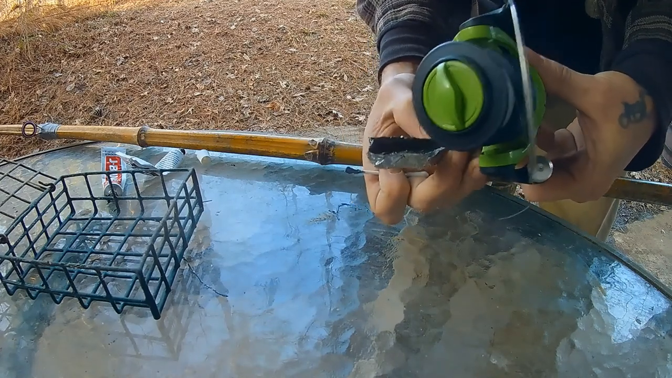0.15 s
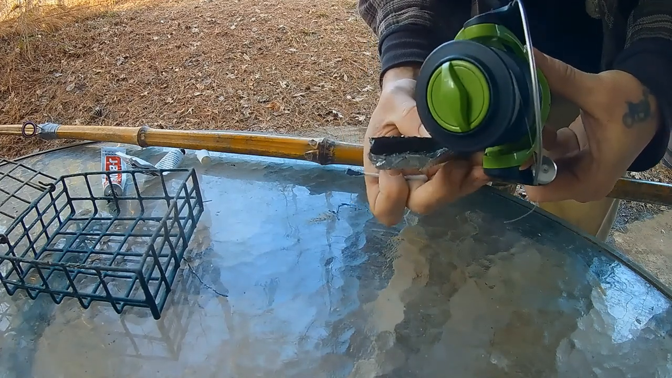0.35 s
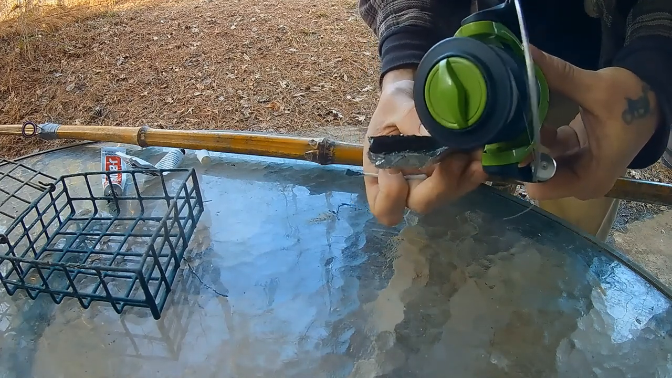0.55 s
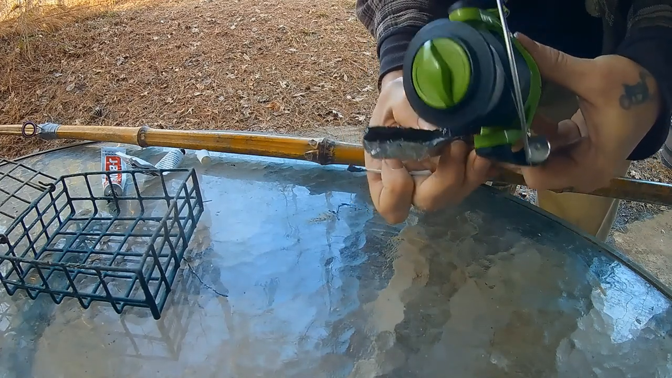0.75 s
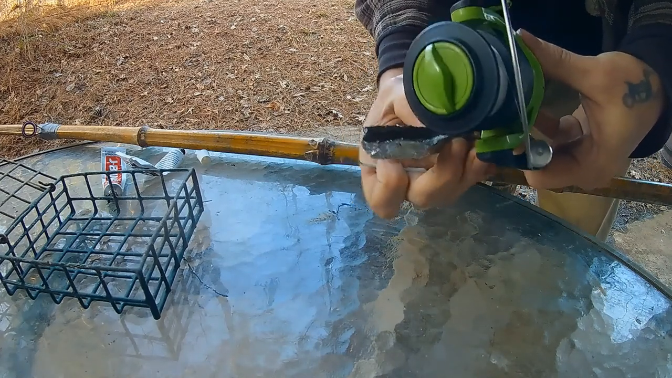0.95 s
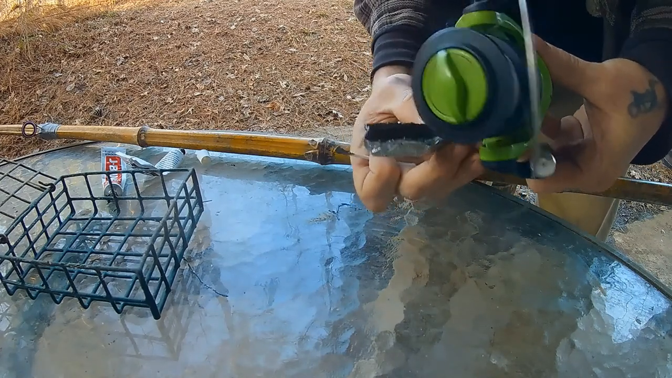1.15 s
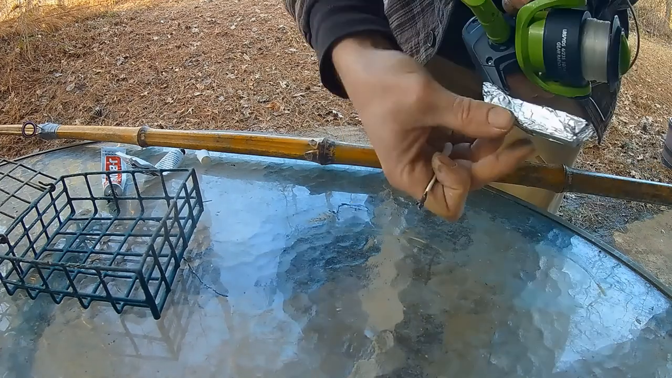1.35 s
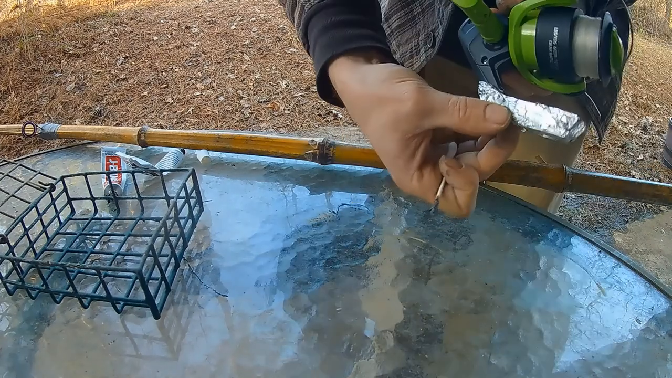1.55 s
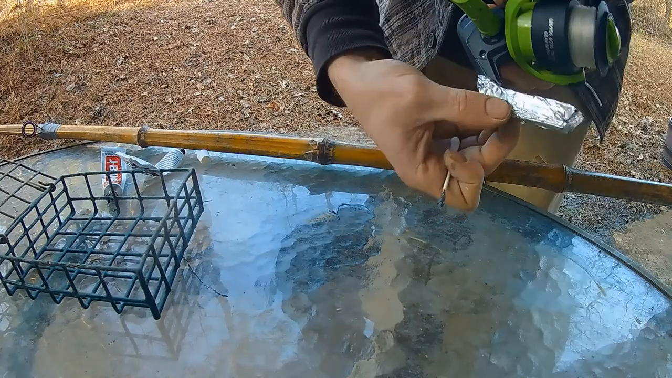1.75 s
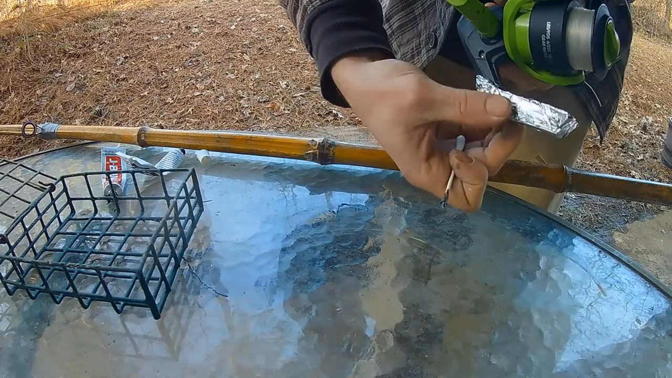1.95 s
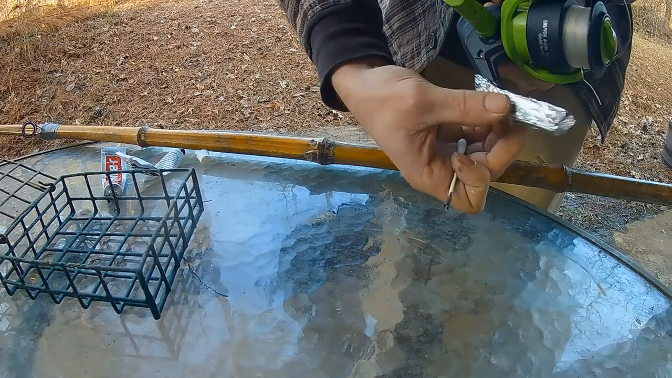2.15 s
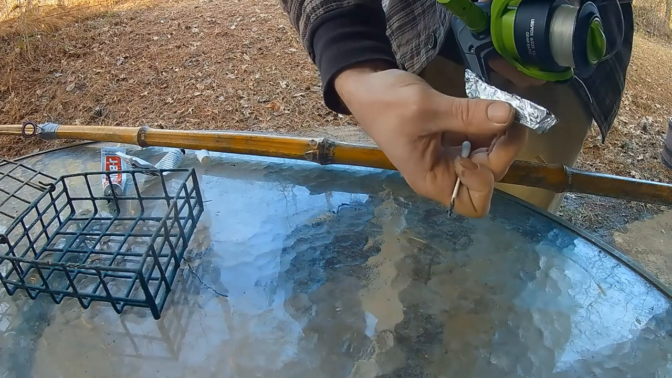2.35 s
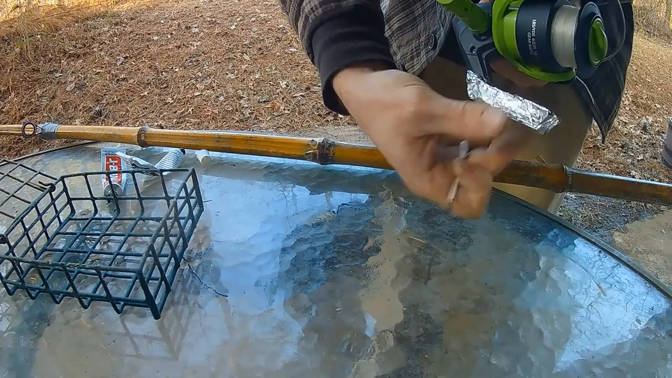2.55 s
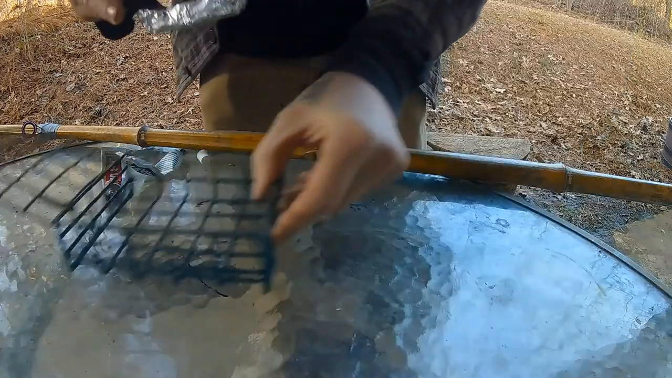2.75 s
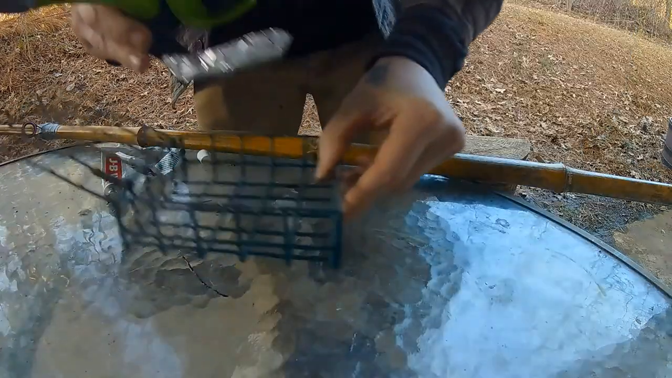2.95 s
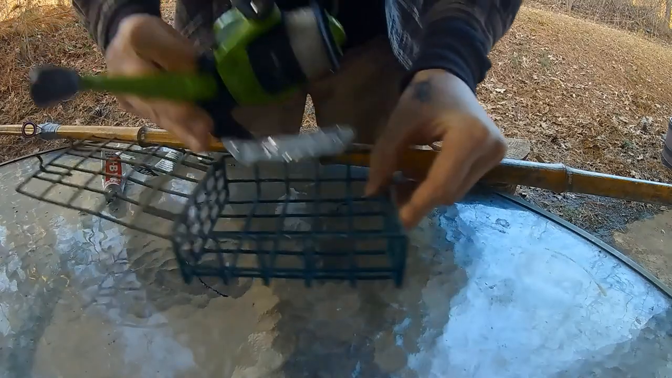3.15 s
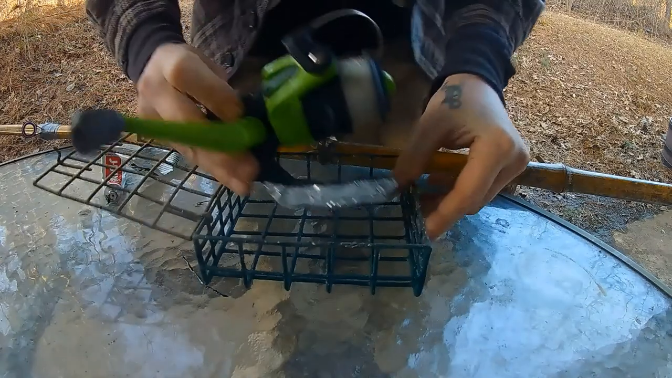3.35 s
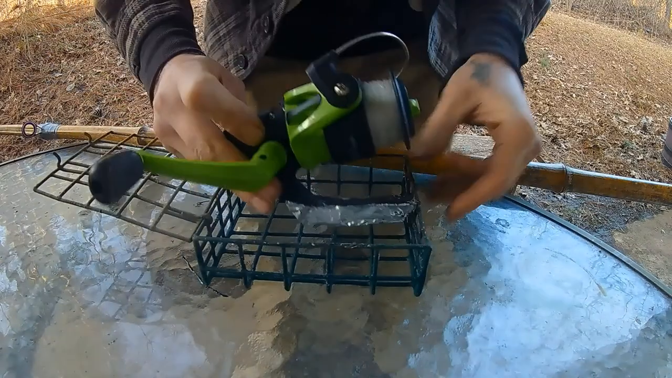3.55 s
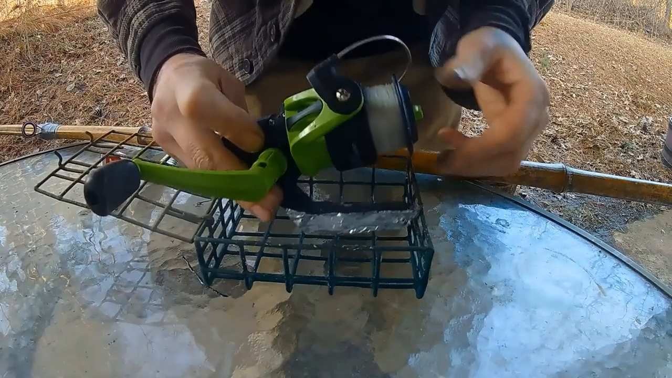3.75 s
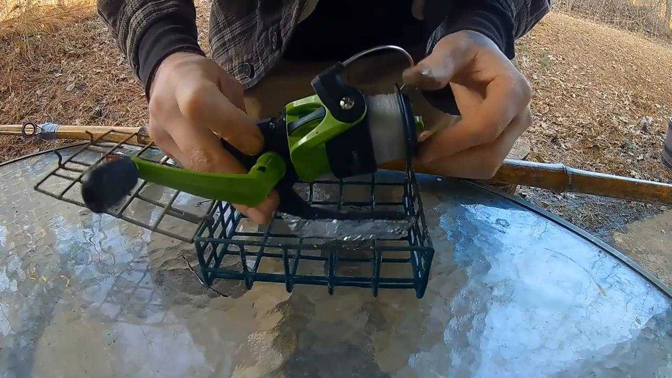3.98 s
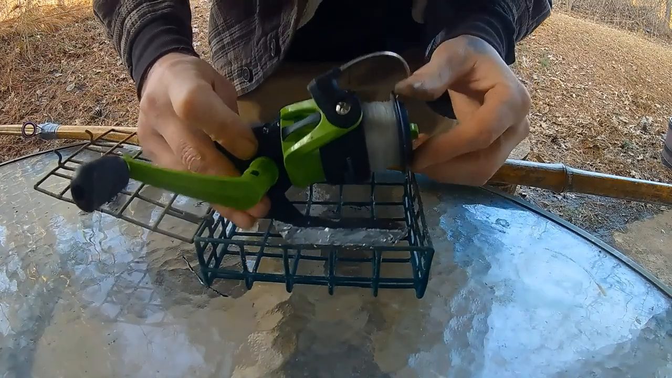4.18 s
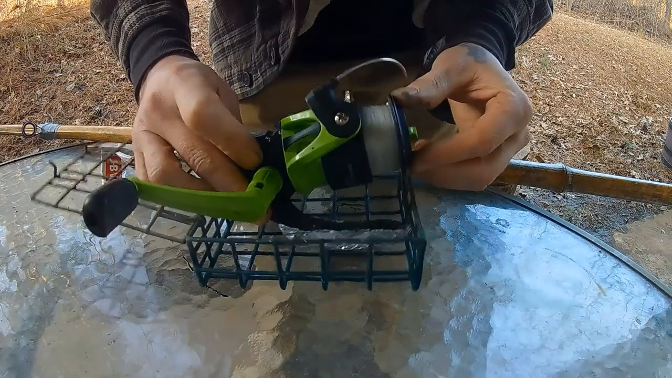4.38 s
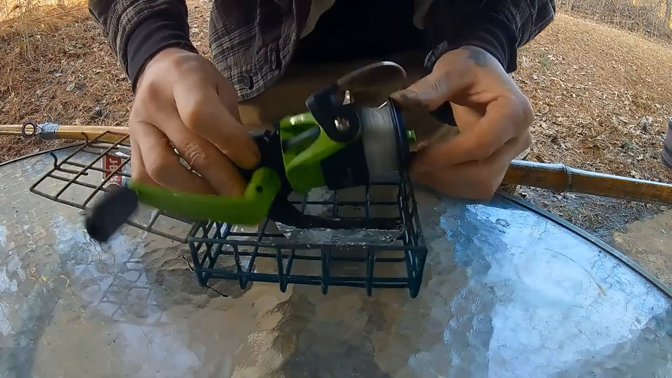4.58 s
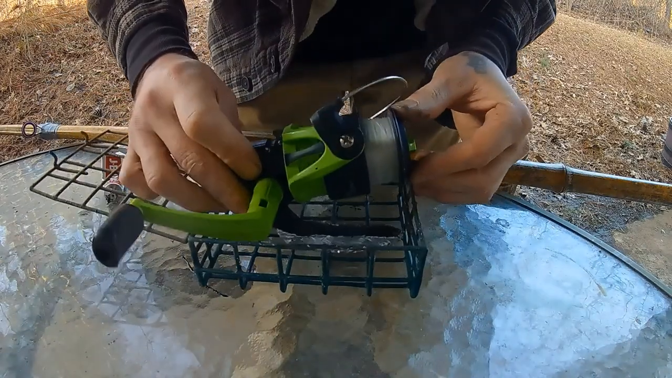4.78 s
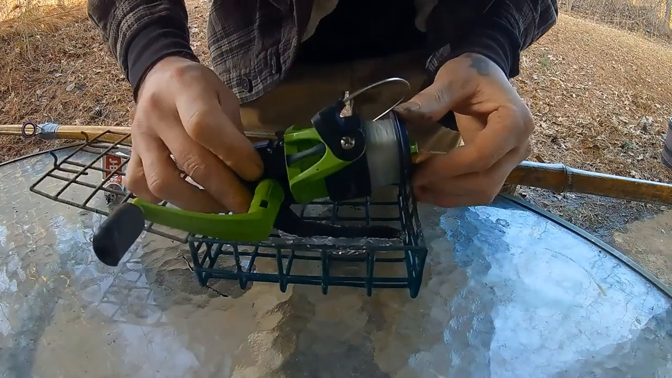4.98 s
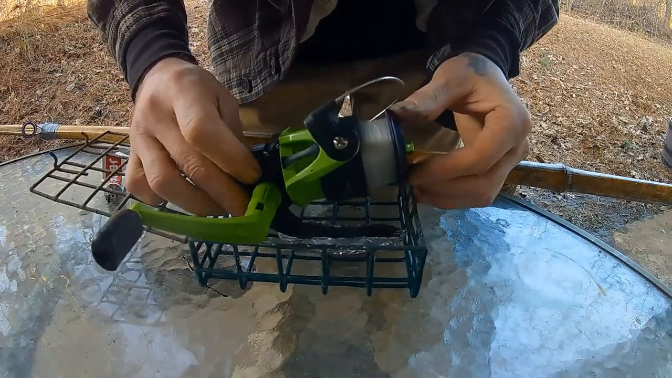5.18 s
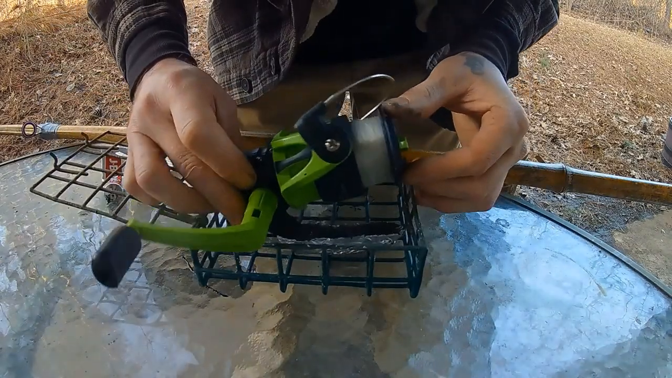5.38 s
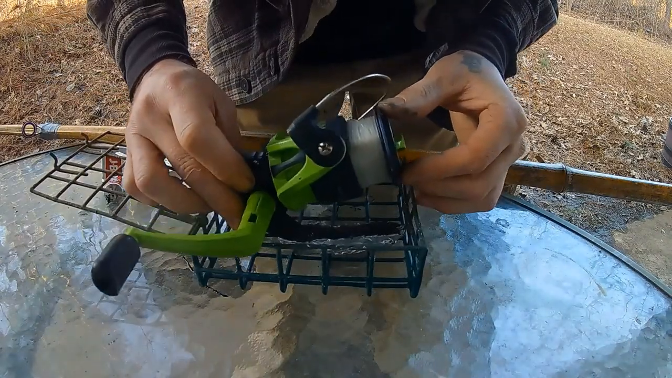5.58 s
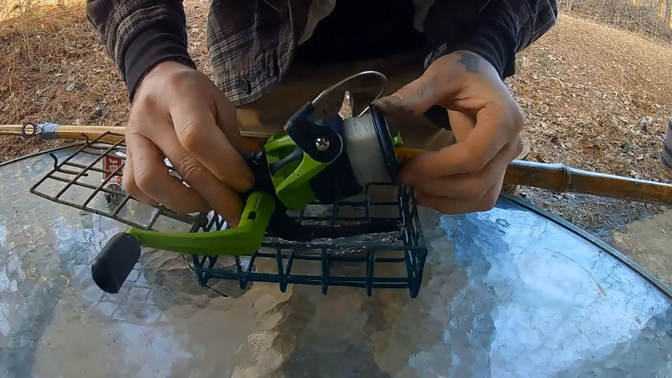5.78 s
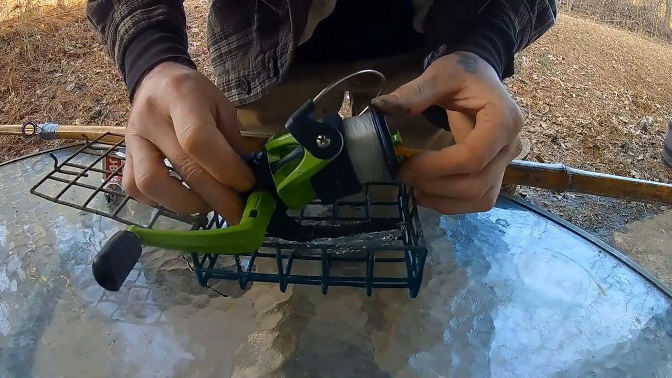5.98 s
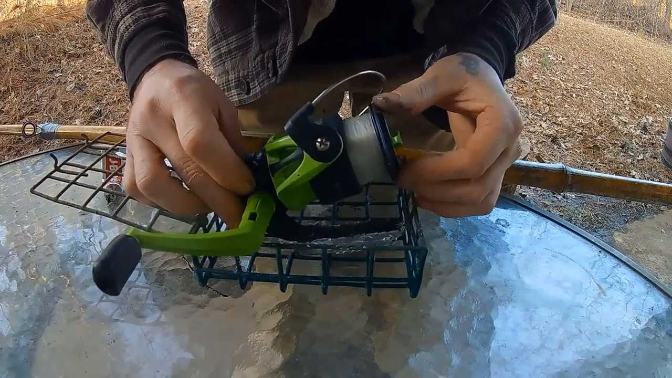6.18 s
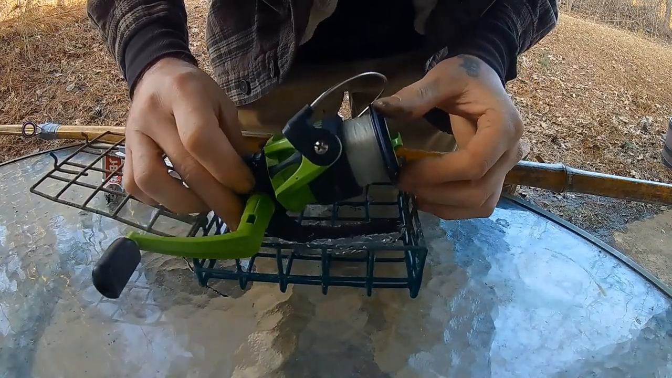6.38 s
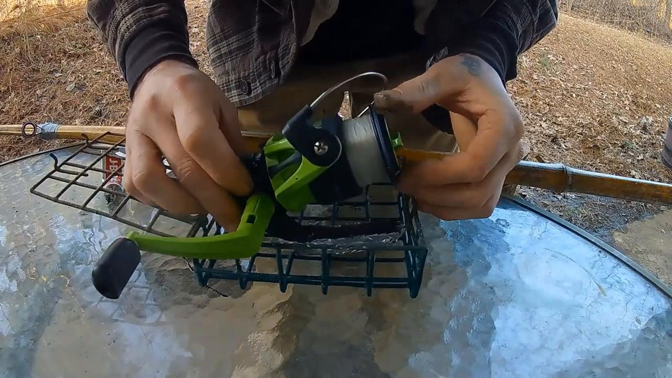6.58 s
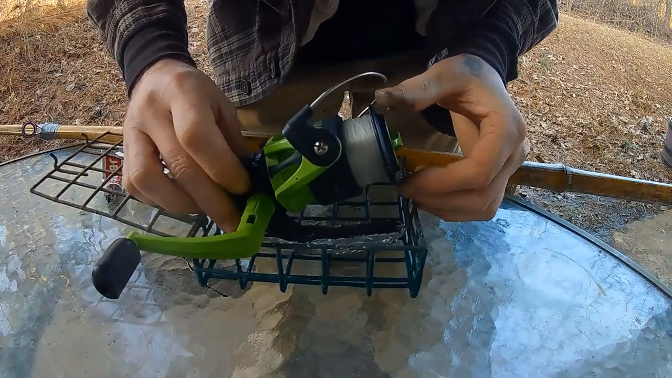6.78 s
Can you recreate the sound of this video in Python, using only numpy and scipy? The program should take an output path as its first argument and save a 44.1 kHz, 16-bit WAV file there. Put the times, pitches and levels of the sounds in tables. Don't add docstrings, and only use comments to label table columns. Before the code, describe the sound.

A quiet garden with rumbling breeze and distant road hum, thin bird chips and sparse crackly ticks opens the scene, with two momentary dropouts. Near the middle a metal wire basket scrapes and rattles onto a glass tabletop, loudest of all. A rod taps, then a heavy small reel settles with a run of dull knocks, followed by another firm bump. Soft rubbing and tiny shifts remain. Close, dull contact sound through the pane, with a slight loose buzz.

```python
import sys
import numpy as np
from scipy import signal
from scipy.fft import rfft, irfft, next_fast_len
from scipy.io import wavfile
from scipy.ndimage import uniform_filter1d, map_coordinates

SR = 44100
rng = np.random.default_rng(int(sys.argv[2]) if len(sys.argv) > 2 else 0)


def master_out(mix):
    frames = np.transpose(np.atleast_2d(mix))
    ceiling = np.clip(frames, -1, 1)
    pcm = np.round(ceiling * 32767).astype(np.int16)
    wavfile.write(sys.argv[1], SR, pcm)


def volts(x):
    e = np.asarray(x, float) / 20
    return 10 ** e


N = 301203


def unit(x):
    return x / np.sqrt(np.mean(x ** 2) + 1e-20)


def along(points, hz):
    f, v = np.transpose(points)
    return np.interp(np.log(hz + 1), np.log(f + 1), v)


def wobble(knots_per_s):
    knots = rng.standard_normal(int(N * knots_per_s / SR) + 4)
    return map_coordinates(knots, [np.arange(N) * knots_per_s / SR])


def noise(spectrum, count):
    m = next_fast_len(count)
    gain = volts(along(spectrum, np.fft.rfftfreq(m, 1 / SR)))
    return unit(irfft(rfft(rng.standard_normal(m)) * gain, m)[:count])


def add(track, start_s, x):
    part = track[round(start_s * SR):][:len(x)]
    part += x[:len(part)]


# start_s, peak_db, brightness_db, table_sway_db
BASKET_HITS = [(3.072, -22, -21.5, -14), (3.081, -25.5, -27, -10), (3.093, -15.5, -18.5, -13.5),
               (3.098, -20.5, -17, -8.5), (3.108, -23.5, -20.5, -14.5), (3.118, -33.5, -20, -8.5),
               (3.178, -25, -26, -16), (3.192, -30.5, -23, -23), (3.206, -39, -20.5, -17.5),
               (3.22, -41.5, -25, -11), (3.237, -27, -28.5, -3), (3.249, -34, -21, -1.5)]
# mode_hz, level_db, t60_s
BASKET_PANE = [(296, 10, 0.026), (416, -14.5, 0.075), (504, 0.5, 0.081), (561, -3, 0.088),
               (724.5, -1.5, 0.13), (866, 6.5, 0.028), (1096, -7.5, 0.15), (1325, -10, 0.13),
               (1670, -4.5, 0.061), (1960, -3, 0.027), (2100, -25, .05), (2810, -23.5, 0.076),
               (3680, -23, 0.038), (4770, -41, 0.025)]


def basket():
    return knocks(BASKET_HITS, BASKET_PANE, 470, chatter_db=-11.5, chatter_t60_s=0.056,
                  thud_db=-1.5, crack_db=-9, buzz_db=-37.5)


# start_s, peak_db, brightness_db, table_sway_db
REEL_HITS = [
    (3.955, -23, -26.5, -20),
    (3.965, -30.5, -32, -19),
    (3.974, -26.5, -27.5, -14.5),
    (3.986, -33, -31, -15.5),
    (3.994, -32.5, -34, -10),
    (4.278, -48, -35, -14),
    (4.299, -52, -25, -19),
]
# mode_hz, level_db, t60_s
REEL_PANE = [(160.4, -20.5, 0.3), (261, 7, 0.033), (310, -1.5, 0.071), (443, 0, 0.046),
             (503.5, -2.5, 0.073), (625, -13.5, 0.046), (686, -13, 0.081), (796, -15.5, 0.11),
             (875, 1, 0.031), (1063, -7.5, 0.065), (1367, -7.5, 0.16), (1900, -12, 0.08),
             (2370, -18, 0.054), (4340, -18.5, 0.033), (5000, -16, 0.02)]


def reel():
    return knocks(REEL_HITS, REEL_PANE, 270, chatter_db=-14, chatter_t60_s=0.045,
                  thud_db=-1.5, crack_db=-9, buzz_db=-36)


# start_s, peak_db, brightness_db, table_sway_db
FOOT_HITS = [
    (3.055, -27.5, -45.5, -14.5),
    (3.587, -54, -40, -26),
    (4.568, -26, -28.5, -12),
    (4.586, -32, -31.5, -22),
    (4.6, -36.5, -37, -16),
    (5.719, -48.5, -46, 11.5),
    (6.209, -56, -39, 3),
    (6.321, -50.5, -29, 10),
]
# mode_hz, level_db, t60_s
FOOT_PANE = [(156.5, -13.5, 0.32), (228, 0, 0.043), (306.3, 3.5, 0.18), (360, -10.5, 0.041),
             (481, 2.5, 0.083), (565, -11, 0.2), (739.5, -10.5, 0.24), (851, -32, 0.088),
             (1050, -15.5, 0.082), (1346, -4, 0.091), (1911, -13.5, 0.13), (2150, -14.5, 0.06),
             (4900, -21, 0.055), (260, 9.5, 0.017)]


def foot():
    return knocks(FOOT_HITS, FOOT_PANE, 250, chatter_db=-15.5, chatter_t60_s=0.027,
                  thud_db=-3.0, crack_db=-22, buzz_db=-32.5)


# start_s, peak_db, brightness_db, table_sway_db
ROD_HITS = [
    (3.344, -40, -63, -10),
    (3.415, -30, -22, -8.5),
    (3.427, -40, -31.5, -4.5),
    (3.457, -45.5, -33, -15.5),
]
# mode_hz, level_db, t60_s
ROD_PANE = [(171.6, -8.5, 0.36), (226, -4, 0.24), (296, -1, 0.099), (416, -13, .12), (536, -1, 0.082),
            (664, -20, 0.068), (805, 1.5, 0.029), (1100, -2, 0.047), (1400, -3, 0.063), (2400, -19, .04),
            (2820, -33, .035), (3670, -25, 0.032)]


def rod():
    return knocks(ROD_HITS, ROD_PANE, 250, chatter_db=-6, chatter_t60_s=0.052,
                  thud_db=-0.5, crack_db=-11.5, buzz_db=-52)


# start_s, peak_db, brightness_db, table_sway_db
WIRE_HITS = [
    (2.83, -52, -23, -17),
    (2.874, -48, -24, -14),
    (2.881, -45, -35, -11),
    (2.892, -53, -33, -24),
    (2.9, -56, -22, -12),
    (2.909, -51, -28, -23),
    (3.72, -64, -20, -10),
    (3.755, -55, -25, -19),
    (6.485, -56, -14, -7),
]
# mode_hz, level_db, t60_s
WIRE_PANE = [(442, -1.5, 0.026), (810, 2.5, 0.021), (1140, 5.5, 0.025), (1480, -5.5, 0.018),
             (2130, -20, 0.013)]


def wire():
    return knocks(WIRE_HITS, WIRE_PANE, 200, chatter_db=-12, chatter_t60_s=0.028,
                  thud_db=-19, crack_db=-6.0, buzz_db=-54)


# mode_hz, level_db, t60_s
TABLE_LEGS = [(88.5, -4.5, 0.44), (120.3, -9, 0.51)]
# freq_hz, level_db
MOUNT_BUZZ = [(5400, -61), (6200, -21), (8200, -0.5), (9400, -15.5), (11000, -1), (13500, -12), (15500, -2)]
# freq_hz, level_db
GRIT_CRACK = [(900, -30.5), (1400, 0.5), (2300, -5.5), (2900, -17.5), (5000, -23), (5800, -48)]


def knocks(contacts, modes, bounces_per_s, chatter_db, chatter_t60_s, thud_db, crack_db, buzz_db):
    out, t = np.zeros(N), np.arange(SR // 2) / SR
    t_chatter, t_push = t[:SR // 10], t[:SR // 100]
    flight_s, mid_hz, top_hz = 0.003, SR / 36, SR / 14
    low = ring([m for m in modes if m[0] < mid_hz], t)
    high = ring([m for m in modes if mid_hz <= m[0] < top_hz], t)
    top = ring([m for m in modes if m[0] >= top_hz], t)
    feet_damping = signal.butter(8, 5200, fs=SR, output="sos")
    no_steady_push = signal.butter(2, 130, "high", fs=SR, output="sos")
    for start_s, peak_db, bright_db, sway_db in contacts:
        chance, size = rng.random((2, SR // 10))
        bounces = (chance < bounces_per_s / SR) * (2 * size - 1)
        bounces *= volts(chatter_db - 60 * t_chatter / chatter_t60_s) * (t_chatter > flight_s)
        bounces[0] = 1

        contact_s = 0.00006 * volts(-0.5 * (bright_db + 12.0))
        push = t_push * np.exp(-t_push / contact_s)
        dull = low + volts(thud_db) * (1 - np.exp(-t / 0.003)) * thud(len(t))
        body = signal.fftconvolve(dull, push / push.sum())[:len(t)]
        crack = volts(crack_db - 60 * t / 0.049) * (1 - np.exp(-t / 0.00035)) * noise(GRIT_CRACK, len(t))
        hard = high + crack + volts(0.8 * (bright_db + 25)) * top
        pane = signal.fftconvolve(bounces, body + volts(bright_db + 15.5) * hard)[:len(t)]
        pane = signal.sosfilt(feet_damping, pane)
        pane = signal.sosfilt(no_steady_push, pane)

        sway = volts(sway_db) * ring(TABLE_LEGS, t) * (1 - np.exp(-t / 0.011))
        buzz_level = buzz_db + 0.5 * bright_db - 0.1 * (peak_db + 15.0)
        buzz = volts(buzz_level - 60 * t / 0.08) * (1 - np.exp(-t / 0.0033)) * noise(MOUNT_BUZZ, len(t))
        add(out, start_s + 0.002, volts(peak_db - 1.0) * (pane / np.abs(pane).max() + sway + buzz))
    return out


def ring(modes, t):
    out = np.zeros(len(t))
    for k, (hz, db, t60_s) in enumerate(modes):
        sign = -1 if k % 3 == 2 else 1
        out += sign * volts(db - 60 * t / t60_s) * np.sin(2 * np.pi * hz * t)
    return out


# freq_hz, level_db
THUD_SPECTRUM = [(90, -42.5), (250, -1.5), (800, 0), (1500, -13.5), (2600, -13), (5000, -57), (6000, -79)]
# freq_hz, t60_s
THUD_DECAY = [(150, 0.27), (600, 0.16), (2500, 0.11)]


def thud(count):
    hz, t, z = signal.stft(noise(THUD_SPECTRUM, count), SR, nperseg=256)
    decay = volts(-60 * t / along(THUD_DECAY, hz)[:, None])
    return signal.istft(z * decay, SR, nperseg=256)[1][:count]


# middle_s, length_s, level_db
SLIDES = [
    (.95, 0.41, -73.5),
    (2.803, .15, -75),
    (3.214, 0.32, -63.5),
    (3.758, 0.25, -65.5),
    (4.314, 0.2, -69.5),
    (4.752, 0.33, -66.5),
    (5.453, 0.16, -73),
]
# freq_hz, density_db
SLIDE_SPECTRUM = [(120, -39), (300, 5), (900, -1.5), (1600, -16), (3000, -28.5), (5500, -38.5), (7000, -66)]


def rubs():
    t = np.arange(N) / SR
    swell = np.zeros(N)
    for middle_s, length_s, db in SLIDES:
        swell += volts(db) * np.exp(-(2 * (t - middle_s) / length_s) ** 2)
    return swell * volts(3 * wobble(60)) * noise(SLIDE_SPECTRUM, N)


# start_s, peak_db, pitch_hz, spread_octaves
DRY_TICKS = [
    (0.847, -52, 1400, 1.57),
    (.861, -73, 4500, .8),
    (1.274, -52, 2560, 0.42),
    (1.319, -68, 5000, 0.45),
    (2.545, -60, 2400, 0.47),
    (3.941, -58, 4770, 0.2),
]


def ticks():
    out, t = np.zeros(N), np.arange(SR // 20) / SR
    for start_s, db, hz, spread in DRY_TICKS:
        hump = [(hz * 2 ** (k * spread), -9 * k * k) for k in range(-2, 3)]
        envelope = volts(db - 5 - 60 * t / 0.022) * (1 - np.exp(-t / 0.001))
        add(out, start_s, envelope * noise(hump, len(t)))
    return out


# start_s, length_s, from_hz, to_hz, level_db
BIRD_CHIPS = [
    (.275, 0.018, 6700, 7700, -84),
    (.405, .015, 7200, 7600, -87),
    (.75, 0.017, 6600, 7760, -75),
    (0.859, .038, 6620, 7640, -75),
    (.893, .025, 7640, 7610, -81),
    (1.525, 0.011, 6900, 7850, -85),
    (5.61, .02, 6700, 7800, -86),
]


def bird():
    out, t = np.zeros(N), np.arange(SR // 4) / SR
    for start_s, length_s, from_hz, to_hz, db in BIRD_CHIPS:
        u = np.arange(round(length_s * SR)) / (length_s * SR)
        phase = 2 * np.pi * np.cumsum(from_hz + (to_hz - from_hz) * u) / SR
        add(out, start_s, volts(db + 5) * np.sin(np.pi * u) * np.sin(phase))
    trees = rng.standard_normal(len(t)) * volts(-60 * t / 0.27)
    return out + volts(-4.5) * signal.fftconvolve(out, trees / np.linalg.norm(trees))[:N]


# freq_hz, density_db
WIND_RUMBLE = [(11, -38), (18, -6), (47, 4.5), (81, -1), (118, -10.5), (172, -10), (200, -11.5), (260, -39),
               (440, -120)]
# freq_hz, density_db
TRAFFIC_HUM = [(60, -20.5), (100, -4), (170, -12), (330, -14), (408, -12), (500, -16.5), (842, -18),
               (1120, -23.5), (1470, -32), (2500, -38.5), (4800, -47.5), (6300, -52), (10000, -57.5),
               (15700, -60)]
# time_s, level_db
WIND_STRENGTH = [(0, -59), (.46, -60), (1.2, -61), (1.8, -56.5), (2.36, -61), (2.7, -56.5), (3.15, -59.5),
                 (3.35, -52.5), (3.8, -54), (4.75, -55.5), (6.1, -59), (6.37, -54.5), (6.83, -52.5)]


def air():
    t = np.arange(N) / SR
    traffic_db, recede_db_per_s = -61.5, 0.14
    lumps = volts(np.interp(t, *np.transpose(WIND_STRENGTH)) + 0.4 * wobble(4.0))
    flutter_db = 0.22 * wobble(1.6) + 0.69 * wobble(3.4) + 0.46 * wobble(22)
    swell = volts(traffic_db - recede_db_per_s * t + flutter_db)
    return lumps * noise(WIND_RUMBLE, N) + swell * mottled(noise(TRAFFIC_HUM, N), patchy_db=3.5)


def mottled(x, patchy_db):
    hz, _, z = signal.stft(x, SR, nperseg=1024)
    field = uniform_filter1d(rng.standard_normal(z.shape), size=3, axis=0)
    field = uniform_filter1d(field, size=3, axis=1)
    depth_db = patchy_db * np.clip(hz / 4000, 0, 1)[:, None]
    return signal.istft(z * volts(depth_db * unit(field)), SR, nperseg=1024)[1][:N]


def scene():
    gear = basket() + reel() + foot() + rod() + wire()
    return (gear + rubs() + ticks() + bird() + air())[None]


# middle_s, length_s
TREBLE_GAPS = [(0.102, 0.018), (0.259, .022), (0.382, .018), (0.619, 0.023), (0.712, 0.034), (.92, 0.052),
               (1.039, .02), (1.483, 0.02), (1.844, 0.015), (1.95, 0.012), (2.199, 0.014), (2.3, .025),
               (2.5, 0.024), (2.602, .026), (2.851, 0.026), (3.008, 0.02), (3.134, 0.012), (3.189, 0.012),
               (3.302, 0.029), (3.613, .023), (3.796, .04), (3.996, .012), (4.076, 0.022), (4.272, .045),
               (4.555, .016), (4.675, 0.019), (5.346, 0.032), (5.658, 0.018), (6.166, .027), (6.343, 0.016)]


def dry_spells():
    spacing_s, brief_s = 0.15, 0.012
    middles = [row[0] for row in TREBLE_GAPS]
    brief = []
    for a, b in zip(middles, middles[1:] + [N / SR]):
        pieces = max(round((b - a) / spacing_s), 1)
        brief += [(at, brief_s) for at in np.linspace(a, b, pieces + 1)[1:-1]]
    return TREBLE_GAPS + brief


def thin_treble(x, keep_db, lift_db, step_db):
    out, from_hz = x.copy(), 1800
    for middle_s, length_s in dry_spells():
        count = round((1.8 * length_s + 0.016) * SR)
        start, window = round(middle_s * SR) - count // 2, np.sqrt(np.hanning(count))
        lines = rfft(x[start:start + count] * window)
        hz = np.fft.rfftfreq(count, 1 / SR)
        usual = np.sqrt(uniform_filter1d(np.abs(lines) ** 2, size=25))
        kept = np.abs(lines) > volts(keep_db + hz / 4500) * usual
        lift = np.clip(volts(step_db) * np.sqrt(count) / np.abs(lines), 1, volts(lift_db))
        change = (hz > from_hz) * np.where(kept, lift - 1, -0.85)
        out[start:start + count] += irfft(lines * change, count) * window
    return out


# middle_s, half_length_s
SCENE_CHANGES = [
    (1.248, 0.035),
    (2.711, 0.034),
]


def fades():
    t = np.arange(N) / SR
    dips = [np.clip(np.abs(t - s) / half_s, 0, 1) ** 1.34 for s, half_s in SCENE_CHANGES]
    return np.prod(dips, axis=0)


def top_cut(x):
    return signal.sosfilt(signal.butter(12, 15750, fs=SR, output="sos"), x)


def record(dry):
    thinned = thin_treble(dry[0], keep_db=5.5, lift_db=7.5, step_db=-58)
    hiss = volts(-99) * rng.standard_normal(N)
    mix = thinned * fades() + hiss
    return top_cut(mix[None])


dry = scene()
out = record(dry)
master_out(out)
```